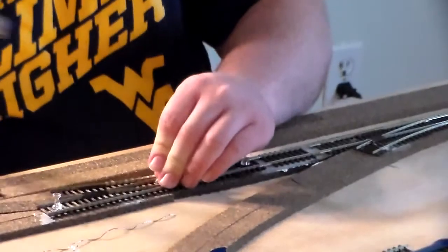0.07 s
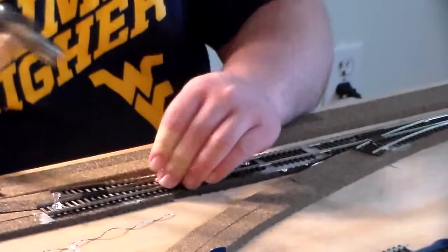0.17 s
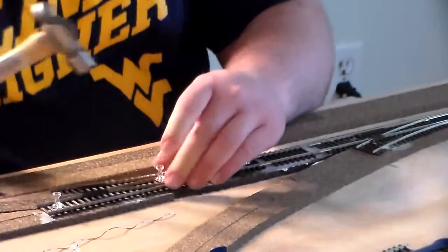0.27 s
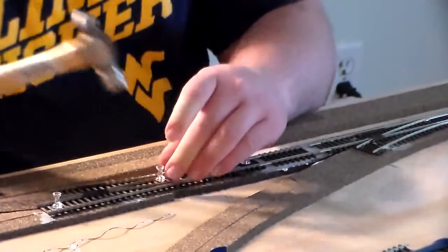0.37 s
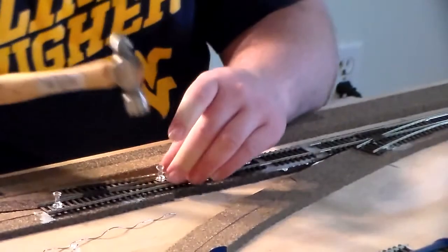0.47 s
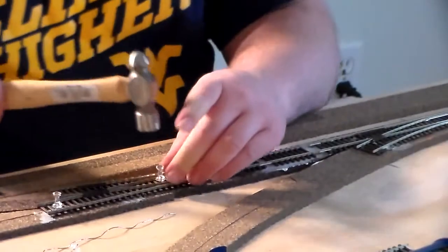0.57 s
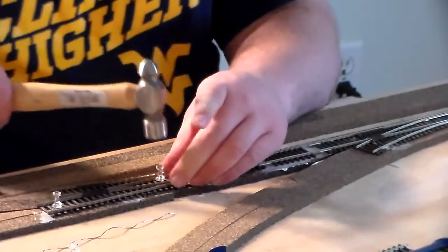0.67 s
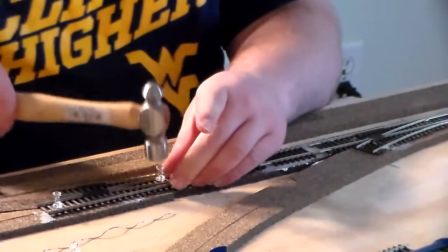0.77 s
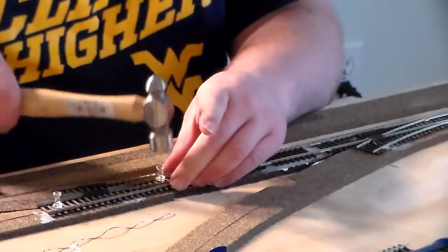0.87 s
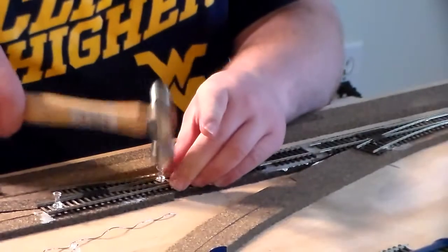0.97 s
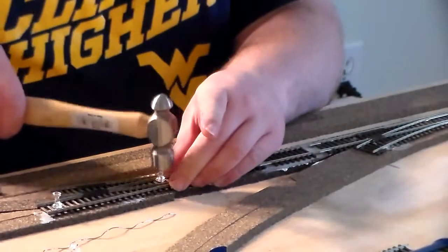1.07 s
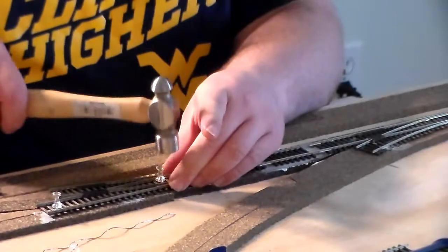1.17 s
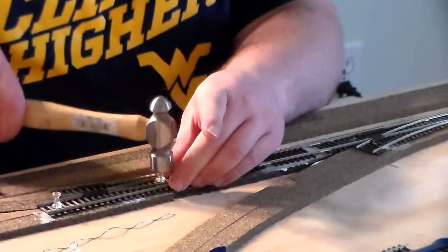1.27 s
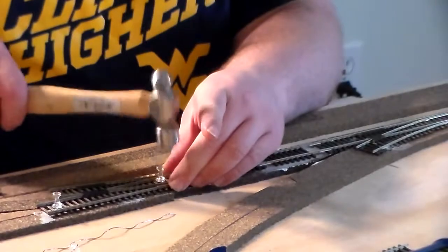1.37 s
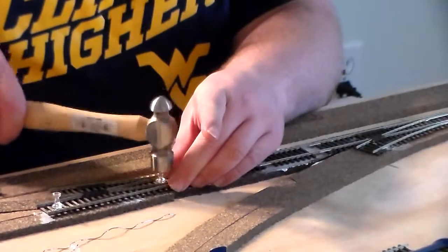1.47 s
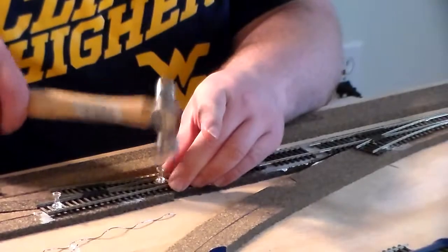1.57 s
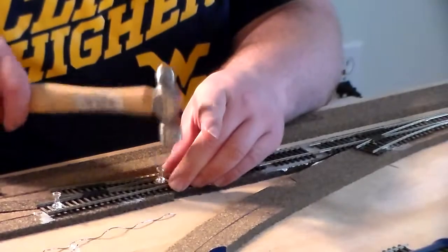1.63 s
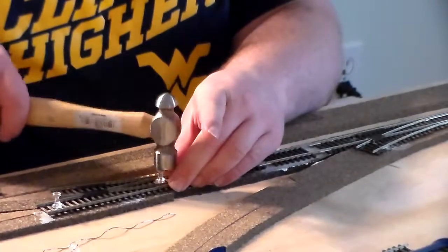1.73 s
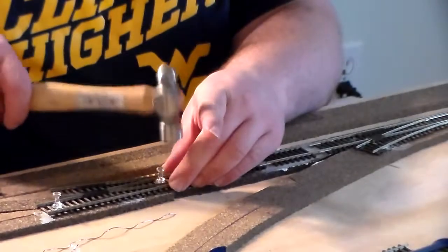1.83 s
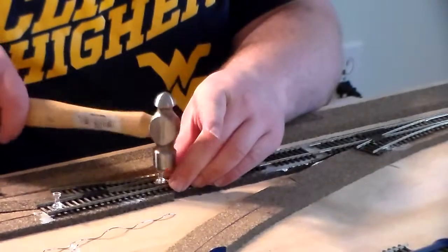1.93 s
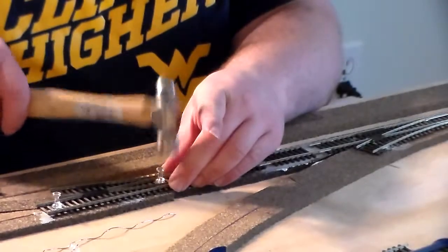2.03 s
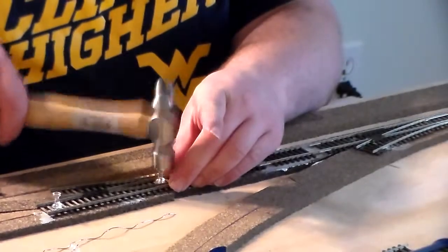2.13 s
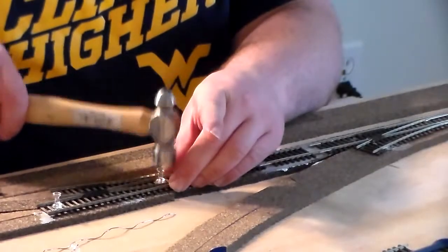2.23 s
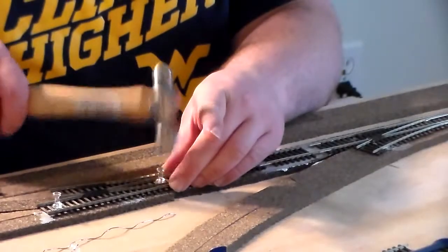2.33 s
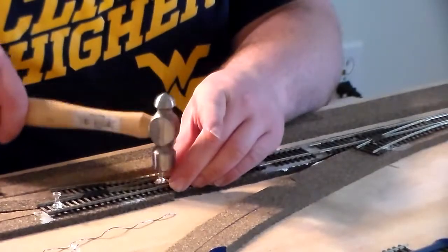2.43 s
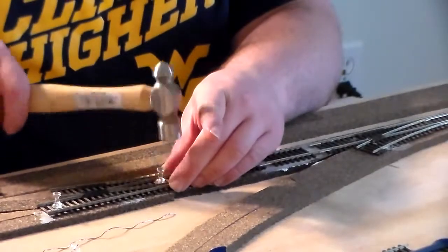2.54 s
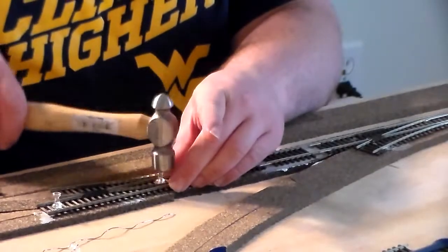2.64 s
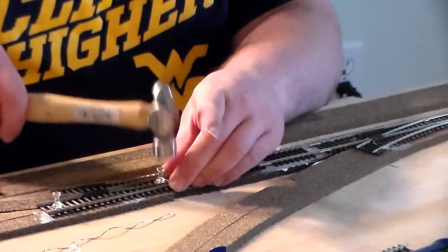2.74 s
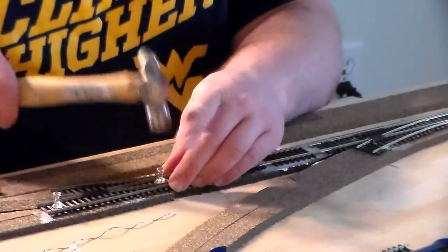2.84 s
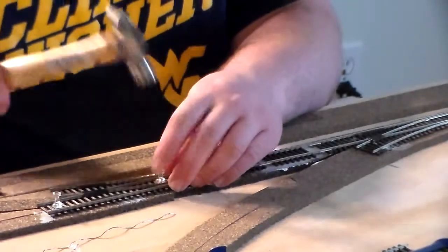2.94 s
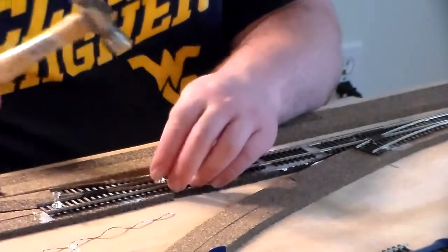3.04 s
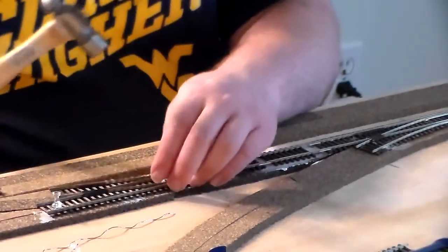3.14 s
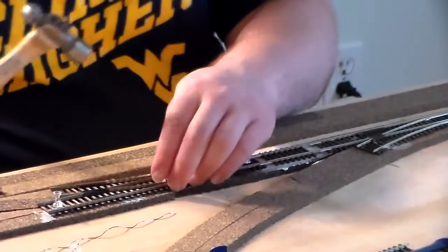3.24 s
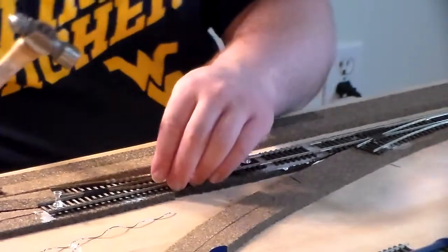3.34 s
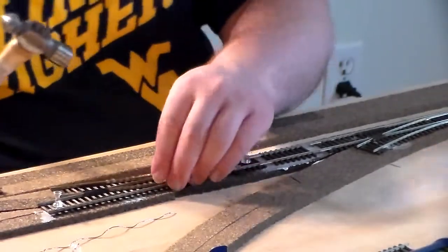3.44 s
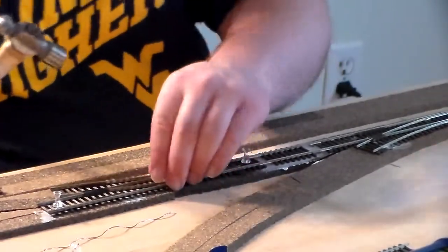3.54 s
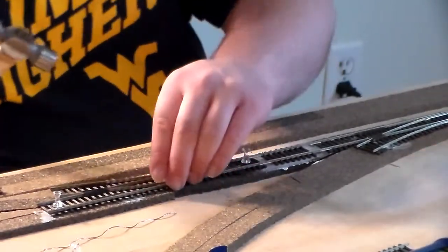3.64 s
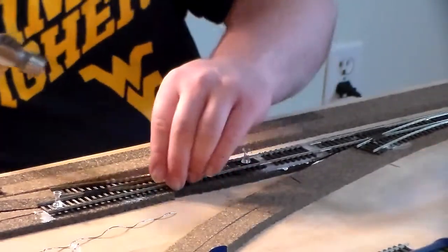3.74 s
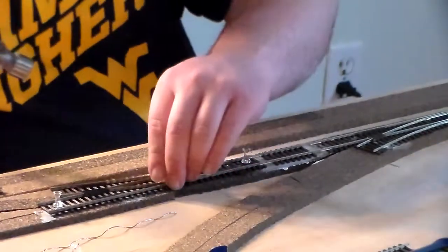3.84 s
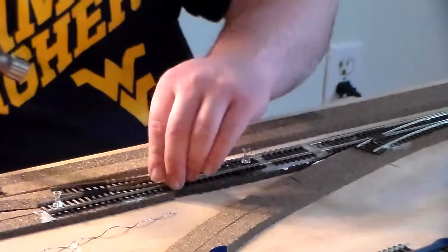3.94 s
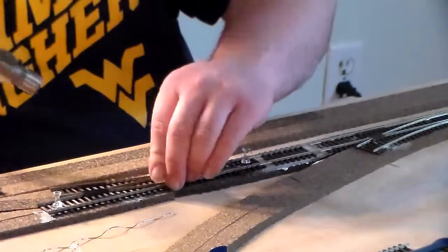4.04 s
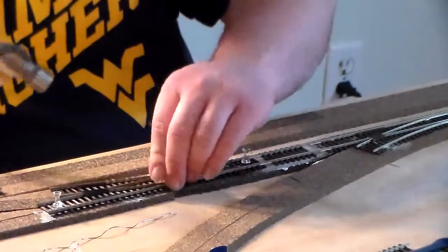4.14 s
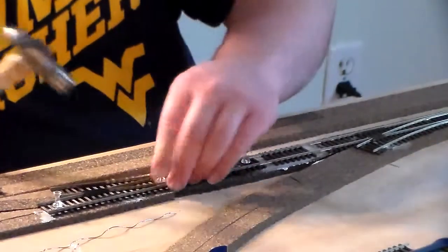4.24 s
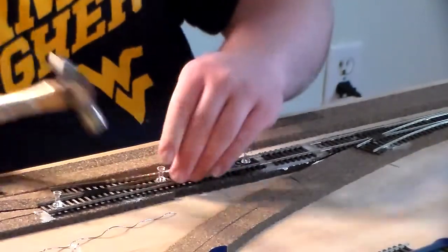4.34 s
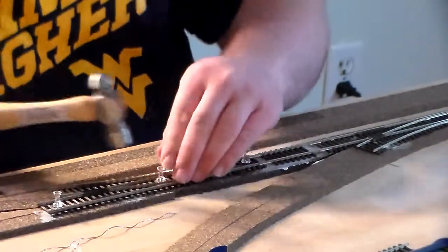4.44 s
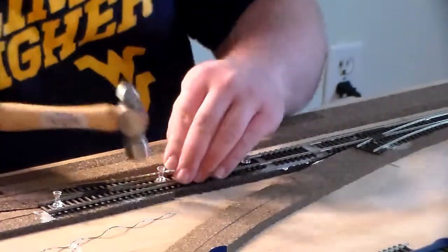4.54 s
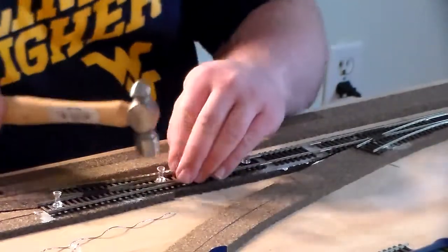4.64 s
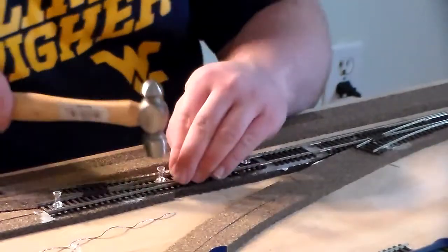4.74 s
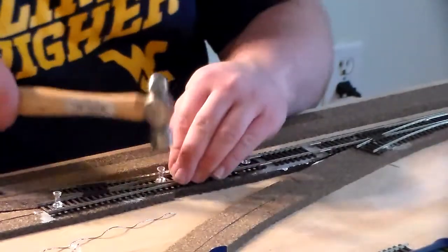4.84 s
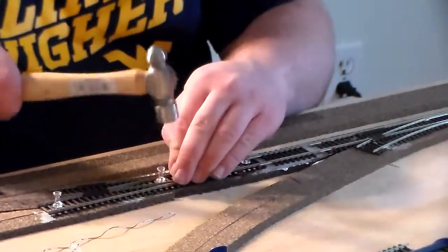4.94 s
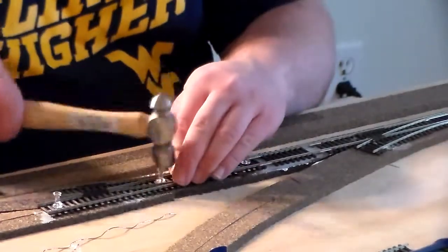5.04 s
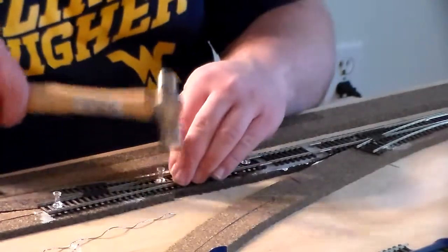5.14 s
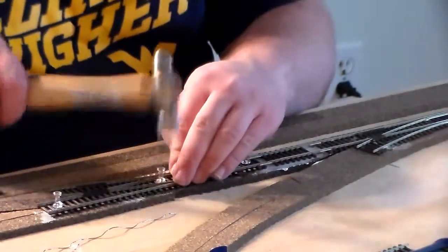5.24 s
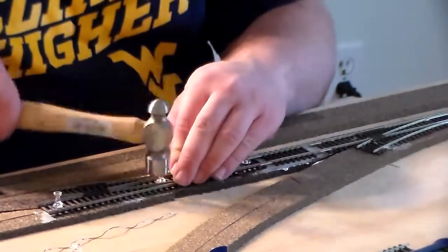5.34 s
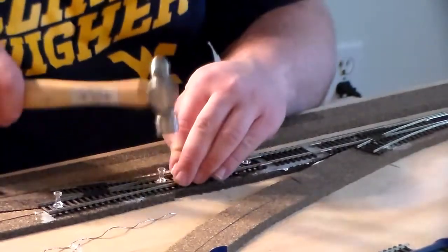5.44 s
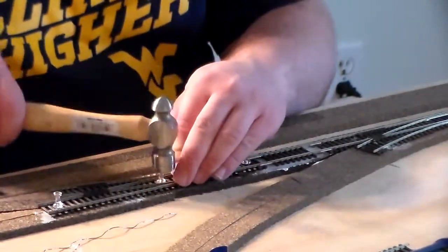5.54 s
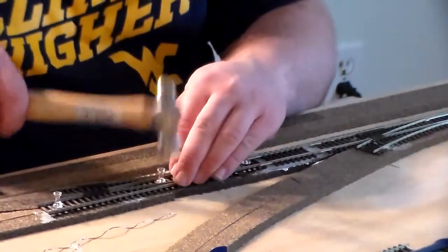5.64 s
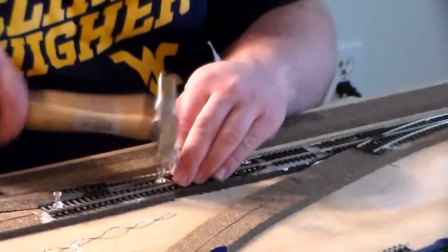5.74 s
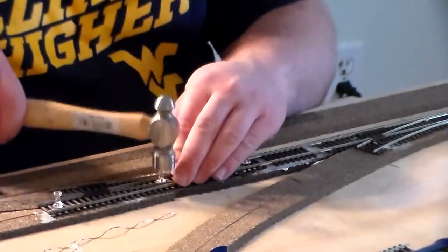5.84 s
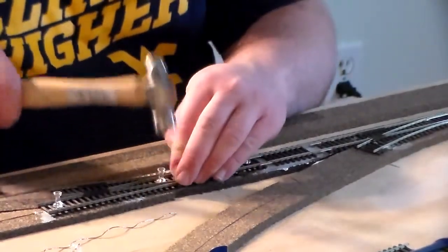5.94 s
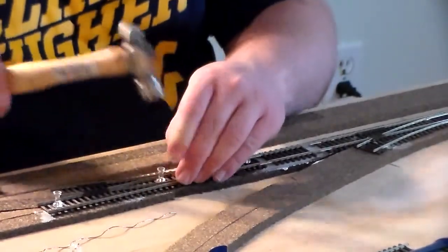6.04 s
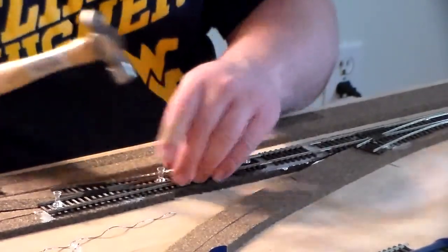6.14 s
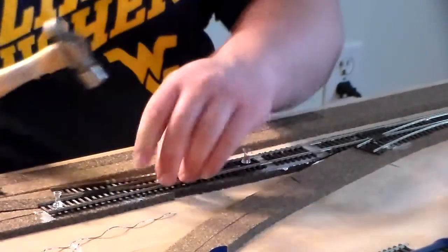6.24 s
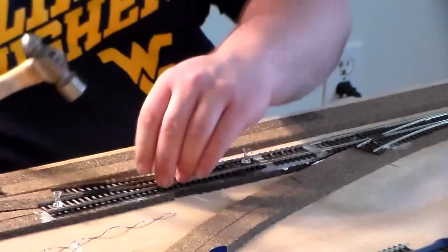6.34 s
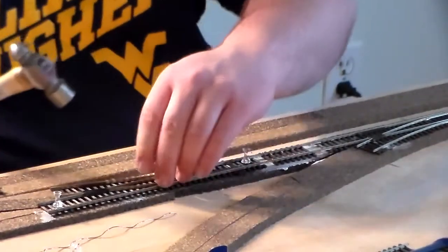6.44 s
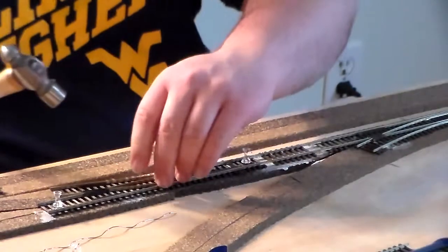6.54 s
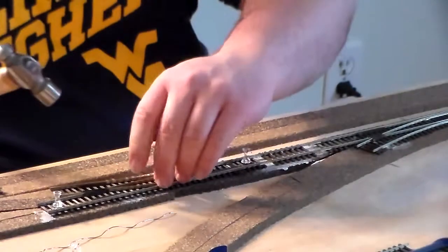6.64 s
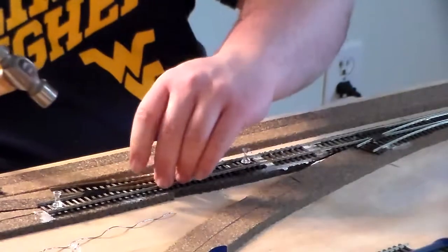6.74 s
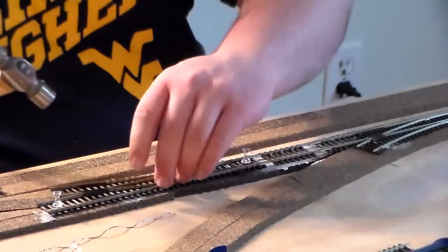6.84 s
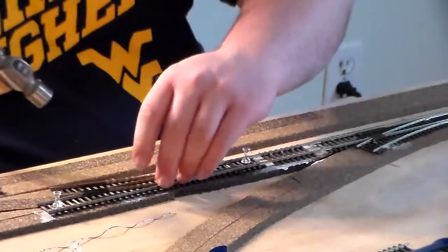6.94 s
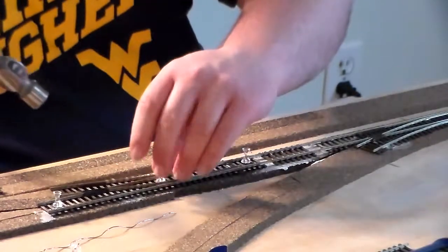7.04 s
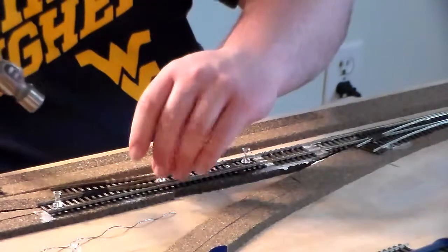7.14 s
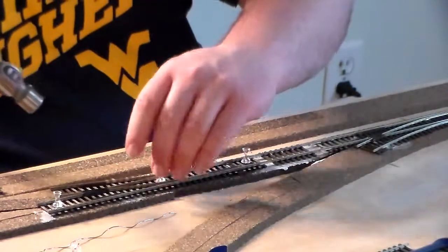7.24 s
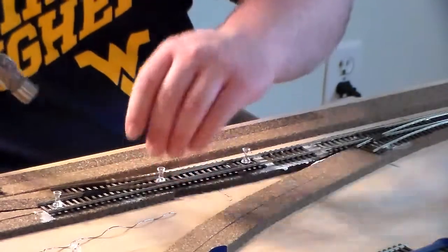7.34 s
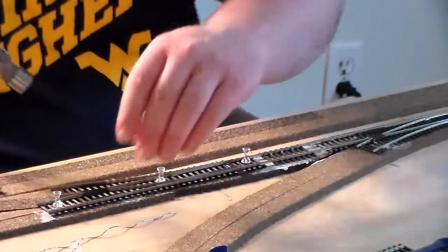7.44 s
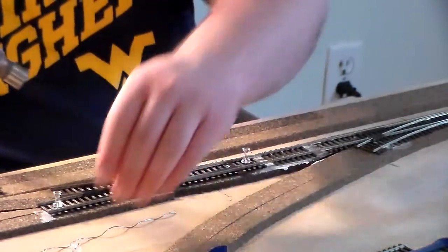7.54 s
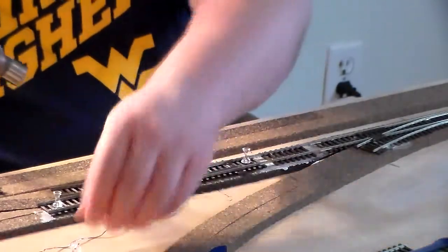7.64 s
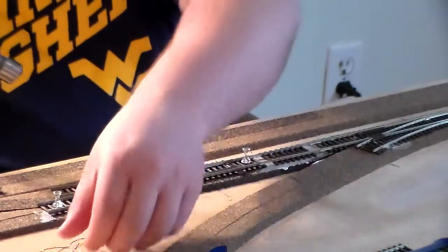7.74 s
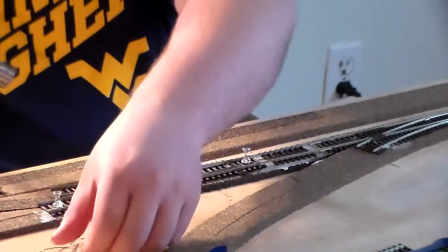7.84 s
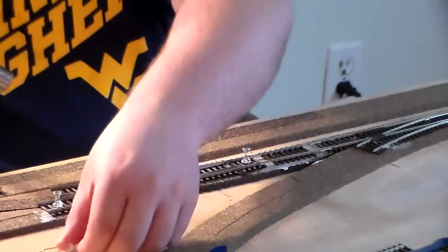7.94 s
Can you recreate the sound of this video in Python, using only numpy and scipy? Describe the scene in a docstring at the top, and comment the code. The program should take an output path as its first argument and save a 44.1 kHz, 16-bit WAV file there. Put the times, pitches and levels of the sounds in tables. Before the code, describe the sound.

A small metal hammer taps two push pins through plastic model track into cork on a wooden table, over low room hum.

```python
"""Fingertips click and rub on model track, then a small hammer taps a push pin through it into cork on a
plywood table: eight blows, the first one double. The pin is let go with a flick; a second takes four blows.
Each blow ticks in the pin, thumps the board's modes, clacks the track and fills a small room with shaped noise.
Sine hum and filtered-noise hiss lie underneath, and the camera's limiter ducks them after the harder blows."""
import sys
import numpy as np
from scipy import signal
from scipy.fft import rfft, irfft, next_fast_len
from scipy.io import wavfile
from scipy.ndimage import uniform_filter1d

SR = 44100
rng = np.random.default_rng(int(sys.argv[2]) if len(sys.argv) > 2 else 0)


def to_wav(s):
    """Save 16-bit WAV."""
    ch = np.atleast_2d(s).T  # columns
    pcm = np.round(np.clip(ch, -1, 1) * 32767)  # PCM
    wavfile.write(sys.argv[1], SR, pcm.astype(np.int16))


N = 352956

# All table levels are relative, before the gains of the functions that use them.
# spectrum of room air and microphone hiss: pitch_hz [Hz], level_db [dB]
AIR_SPECTRUM = [(10, -15), (20, -3.5), (30, -3.5), (45, -8), (65, -3.5), (87, -14), (130, -15),
                (250, -19.5), (460, -17.5), (600, -24.5), (900, -27.5), (2500, -31.5), (6000, -35.5),
                (14500, -39)]
# likeness of the air noise in the two channels: pitch_hz [Hz], likeness [0 to 1]
AIR_LIKENESS = [(30, 0.79), (300, 0.77), (800, 0.53), (2000, 0.35), (5000, 0.05), (14000, 0.039)]
# components of the mains hum: pitch_hz [Hz], level_db [dB rms]
HUM_TONES = [(29.5, -58), (59.6, -65.5), (120, -56), (240, -66), (360, -72)]
# decay of the room: pitch_hz [Hz], t60_s [s]
ROOM_T60 = [(150, 0.45), (500, 0.34), (1500, 0.32), (3500, 0.32), (7000, 0.33), (13000, 0.2)]
# likeness of the room's sound in the two channels: pitch_hz [Hz], likeness [0 to 1]
ROOM_LIKENESS = [(100, 1), (500, 0.96), (1200, 0.91), (2500, 0.89), (4500, 0.6), (8000, 0.2), (14000, 0.14)]
# stiff resonances of the track strip: pitch_hz [Hz], width_hz [Hz], level_db [dB]
TRACK_RESONANCES = [(1880, 490, 2.5), (2653, 100, 2.5), (3500, 250, 2.5), (4635, 130, 5), (5560, 150, 1.5)]
# fingertips landing on the track: start_s [s], level_db [dB], tilt_db [dB per octave]
TOUCHES = [(.845, -20, 2), (3.735, -27, -3), (4.568, -29, -2.5), (6.725, -41, -3), (7.765, -30, 4.5)]
# spectrum of a light click of plastic: pitch_hz [Hz], level_db [dB]
TOUCH_SPECTRUM = [(80, -40), (160, -7.5), (600, 9.5), (1200, 0.5), (3500, 1), (6000, -6), (9000, -13),
                  (14000, -18)]
# fingers letting go of a seated pin: start_s [s], level_db [dB]
RELEASES = [(3.085, -14), (6.124, -13)]
# fingertips rubbing along the pin: start_s [s], length_s [s], level_db [dB]
SCUFFS = [(0.92, .09, -17.5), (3.055, .035, -22)]
# hammer blows: start_s [s], force_db [dB], square_db (squareness of the face on the pin) [dB],
# bass_db (weight of the thump in the bass) [dB], crack_db (crack of the plastic head) [dB]
BLOWS = [(1.1609, -14.5, -2, -14, 2), (1.165, -5.5, -2, -6.5, 13), (1.3989, -2.5, -4, 0.5, 3),
         (1.6184, 2, 0, 5, 3.5), (1.8576, 2.5, -4, 3, -5), (2.0905, 3.5, -6.5, 5, -5),
         (2.3177, 4.5, 3.5, 8.5, -2), (2.5468, 6.5, 1, 7, -10), (2.7702, 7, 3, 3, -5),
         (5.197, 9.5, 2.5, -7, -2), (5.4609, 10, -3.5, -16.5, 8), (5.7005, 12.5, -3, -9.5, -5),
         (5.9265, 12.5, 0, -4.5, 2)]
# modes of the table, before chance shifts them and the hand damps them: pitch_hz [Hz], level_db [dB], t60_s [s]
BOARD_MODES = [(163.5, 3, .28), (196.4, 1.5, 0.26), (221.7, -4.5, 0.29), (270.1, -10.5, 0.38),
               (292.6, 0, 0.18), (361.6, 2.5, 0.15), (422, 2, 0.29), (442, -10.5, 0.44), (474, -4.5, 0.42),
               (517.7, -4, 0.32), (522, -9.5, 0.35), (537, -8.5, 0.43), (558.3, 0, 0.21), (655, -6, 0.39),
               (691.7, -4.5, 0.22), (711, -6.5, 0.38), (876, -24, 0.083), (958, -8.5, 0.233),
               (1180, -23.5, 0.65), (1273, -44, 0.25)]
# first quick heave of the board under the pin: pitch_hz [Hz], level_db [dB], t60_s [s]
HEAVE_MODES = [(237.6, -31, 0.064), (494, -20, 0.043), (674, -52, 0.017)]
# faint ring of the steel hammer head, before detuning: pitch_hz [Hz], level_db [dB], t60_s [s]
STEEL_MODES = [(4500, -51, 0.53), (5400, -63, 0.71), (5520, -49, 0.43), (5520, -51.5, 0.58),
               (5680, -45, 0.37)]
# spectrum of pin and track as the room returns it: pitch_hz [Hz], level_db [dB]
CLACK_SPECTRUM = [(90, -8.5), (160, 2.5), (450, 7), (800, -0.5), (1200, -1.5), (2000, -3), (3000, -5.5),
                  (3900, -4.5), (4800, -12), (6000, -13), (8000, -19), (13000, -16), (16000, -53)]

# limiter: threshold, hold from the start of a run of peaks, and the quiet that ends a run; then the band limit
CEILING_DB, HOLD_S, REST_S = -13.5, 0.51, 1
EDGE_HZ = 14400
# release: the first flick is softer and brighter (dB; tilts in dB per octave)
FLICK_GAP_S, FIRST_FLICK_DB, FIRST_TILT_DB, SECOND_TILT_DB = 0.013, -5, 4.5, 2.5
SCUFF_HZ, SCUFF_GRAINS_PER_S = 3170, 770
# a pin that needs more force gives way for a shorter time: slide at 0 dB, and dB of force that halve it
SLIDE_MS, SLIDE_HALVING_DB = 2.18, 11.5
# thump level (dB), and what it loses overall per dB of bass weight (dB per dB)
THUMP_DB, KNOCK_LOSS = -0.17, 0.32
BOOM_DB = -7  # the thump as the room returns it
# the board's modes vary by chance from blow to blow, in level and pitch (dB, share)
RING_SPREAD_DB, RING_DETUNE = 1.5, 0.0122
# the resting hand damps them, more at lighter blows: t60 at 0 dB of force (s), and dB of force that double it
HAND_T60, HAND_DOUBLING_DB = 0.67, 7
CLACK_TILT_DB, BRIGHTENING = -1.45, 0.071  # dB per octave, and its rise per dB of force
# loose part of the track once pinned down: pitch, share of chance, level, and gain on off-centre blows (dB per dB)
RATTLE_HZ, RATTLE_SPREAD, RATTLE_DB, GLANCE_RATTLE = 2930, 0.09, 4, 0.44
SLACK_DB, SLACK_RANGE_DB = -4, 2.5  # under blows lighter than this the track lies slack and rattles lower
CRACK_DB, CRACK_S = -39.5, 0.0012  # the plastic head's crack: level, decay time constant
# the pin's tick: level, growth with force (dB per dB), pitch, share of chance
TICK_DB, TICK_GROWTH, TICK_HZ, TICK_SPREAD = -14.5, 0.74, 3990, 0.03
# the head sings on hard, off-centre blows: level, dB per dB of force, dB per dB off-centre, share of detuning
STEEL_DB, STEEL_GROWTH, GLANCE_RING, STEEL_DETUNE = -10, 0.94, 1, 0.0081


def amp(db):
    """Logarithmic level: decibels to gain."""
    return 10 ** (np.asarray(db) / 20)


def balance(left_db):
    """Level difference in stereo: left gains what right loses."""
    return amp([[left_db], [-left_db]])


def evened(x):
    """Normalisation: scales to rms 1."""
    return x / np.sqrt(np.mean(x ** 2) + 1e-20)


def read(points, hz):
    """Interpolation on a logarithmic frequency axis."""
    f, value = np.transpose(points)
    return np.interp(np.log(hz + 1), np.log(f + 1), value)


def add(mix, start_s, sound):
    """Superposition: adds a sound to both channels at its start."""
    part = mix[:, max(round(start_s * SR), 0):][:, :sound.shape[-1]]
    part += sound[..., :part.shape[1]]


def colour(x, points, tilt_db=0):
    """Linear filtering: multiplies by a spectrum, tilted by so many dB an octave."""
    size = next_fast_len(x.shape[-1])
    hz = np.fft.rfftfreq(size, 1 / SR)
    gain = amp(read(points, hz) + tilt_db * np.log2((hz + 100) / 3000))
    return irfft(rfft(x, size) * gain, size)[..., :x.shape[-1]]


def pair_noise(size, likeness):
    """Spatial coherence: white noise in two channels, alike in the bass and unlike in the treble."""
    a, b = rfft(rng.standard_normal((2, size)))
    same = np.clip(read(likeness, np.fft.rfftfreq(size, 1 / SR)), 0, 1)
    return irfft(np.array([a, same * a + np.sqrt(1 - same ** 2) * b]), size)


def background():
    """Stationary noise and periodic hum: steady air and hiss, with mains tones whose phase wavers."""
    t = np.arange(N) / SR
    air = evened(colour(pair_noise(next_fast_len(N), AIR_LIKENESS), AIR_SPECTRUM))[:, :N]
    knots = np.linspace(0, t[-1], num=40)
    hum = np.zeros(N)
    for pitch_hz, level_db in HUM_TONES:
        waver = 0.18 * np.interp(t, knots, rng.standard_normal(len(knots)))  # radians
        hum += amp(level_db) * np.sqrt(2) * np.sin(2 * np.pi * pitch_hz * t + waver)
    return (amp(-53.0) * air + hum) * balance(0.2)


def room(noise, spectrum, build_s, tilt_db=0):
    """Diffuse reverberation: reflections thicken while each band dies at its own speed."""
    hz, t, bands = signal.stft(colour(noise, spectrum, tilt_db), SR, nperseg=512)
    decay = amp(-60 * t / read(ROOM_T60, hz)[:, None])
    tail = signal.istft(bands * decay, SR, nperseg=512)[1][:, :SR]
    return tail * (1 - np.exp(-np.arange(SR) / SR / build_s))


def snap(length_s, tilt_db=0):
    """Impulsive excitation: the brief direct crack of hard plastic, decaying exponentially."""
    noise = colour(pair_noise(SR, ROOM_LIKENESS), TOUCH_SPECTRUM, tilt_db)
    return noise * np.exp(-np.arange(SR) / SR / length_s)


def track(x, rattle_hz=3000, rattle_db=5, rattle_width_hz=280):
    """Resonance: the strip's fixed peaks, one rattling part, and random patches that differ each time."""
    hz = np.fft.rfftfreq(2 * SR, 1 / SR)
    peaks_db = np.zeros(len(hz))
    for pitch_hz, width_hz, level_db in TRACK_RESONANCES + [(rattle_hz, rattle_width_hz, rattle_db)]:
        peaks_db += level_db / (1 + ((hz - pitch_hz) / (width_hz / 2)) ** 2)
    knots = np.linspace(0, SR / 2, num=260)
    patches_db = 3.2 * np.interp(hz, knots, rng.standard_normal(len(knots)))
    patches_db *= hz / (hz + 600)  # smooth in the bass
    return irfft(rfft(x, 2 * SR) * amp(peaks_db + patches_db))[..., :SR]


def touch(tilt_db, onset_s):
    """Light impact: one click of plastic, direct and through the room, with a softened onset."""
    tail = room(pair_noise(SR, ROOM_LIKENESS), TOUCH_SPECTRUM, build_s=0.0009, tilt_db=tilt_db)
    click = amp(-15.0) * snap(length_s=0.0034, tilt_db=tilt_db) + amp(-24.5) * tail
    return click * (1 - np.exp(-np.arange(SR) / SR / onset_s))


def scuff(length_s):
    """Stick-slip friction: a swelling run of tiny random slips, each a click that rings the pin."""
    t = np.arange(0, length_s, 1 / SR)
    strength = rng.standard_normal(SR)[:len(t)]
    happens = rng.random(SR)[:len(t)] < SCUFF_GRAINS_PER_S / SR
    slips = strength * happens * np.sqrt(t / length_s)
    slips = slips / (np.linalg.norm(slips) + 1e-9)
    rub = signal.fftconvolve(touch(tilt_db=0.8, onset_s=0.00051), slips[None], axes=1)
    return track(rub, SCUFF_HZ, rattle_db=4, rattle_width_hz=650)


def fingers():
    """Impact and friction: light clicks and scuffs, and the double flick of each pin as it is let go."""
    out = np.zeros((2, N))
    for start_s, level_db in RELEASES:
        first = track(touch(FIRST_TILT_DB, onset_s=0.00063), rattle_hz=4300, rattle_db=8)
        add(out, start_s, amp(level_db + FIRST_FLICK_DB) * first)
        second = track(touch(SECOND_TILT_DB, onset_s=0.00028), rattle_db=3.0)
        add(out, start_s + FLICK_GAP_S, amp(level_db) * second)
    for start_s, level_db, tilt_db in TOUCHES:
        add(out, start_s, amp(level_db) * track(touch(tilt_db, onset_s=0.0023), rattle_db=0.0))
    for start_s, length_s, level_db in SCUFFS:
        add(out, start_s, amp(level_db) * scuff(length_s))
    return out


def ring(modes, turns=0):
    """Modal synthesis: a sum of dying sines, each starting at its own share of a turn."""
    t = np.arange(SR) / SR
    pitch_hz, level_db, t60_s = np.transpose(modes)[..., None]
    return (amp(level_db - 60 * t / t60_s) * np.sin(2 * np.pi * (pitch_hz * t + turns))).sum(0)


def echoed(x, delay_s, db):
    """Specular reflection: a sound and one repeat of it."""
    t = np.arange(len(x)) / SR
    return x + amp(db) * np.interp(t - delay_s, t, x, left=0)


def table(hand_t60, low_hz=138, lag_turns=0.335):
    """Modal vibration: the board heaves, a near surface throws that back, and the damped modes ring on."""
    # each mode trails the one below, so the knock swells for some ms
    lags = -lag_turns * np.arange(len(BOARD_MODES))[:, None]
    modes = []
    luck = rng.standard_normal((len(BOARD_MODES), 2))
    for (pitch_hz, level_db, t60_s), (shift, weight) in zip(BOARD_MODES, luck):
        damped_t60 = 1 / (1 / t60_s + 1 / hand_t60)  # decay rates add
        modes.append((pitch_hz * (1 + RING_DETUNE * shift), level_db + RING_SPREAD_DB * weight, damped_t60))
    heave = echoed(ring(HEAVE_MODES), delay_s=0.009825, db=-6.0)
    wood = amp(-31.5) * ring(modes, lags) + amp(0.33) * heave
    # the board radiates little deep bass
    return signal.sosfilt(signal.butter(4, low_hz, "high", fs=SR, output="sos"), wood)


def push(x, slide_ms, bass_db, stop=0.62, bass_hz=320):
    """Stick-slip as a comb filter: the pin breaks loose and stops again, two opposite kicks."""
    hz = np.fft.rfftfreq(2 * SR, 1 / SR)
    delay = np.exp(-2j * np.pi * hz * slide_ms / 1000)
    kicks = 1 - stop * delay / (1 + (hz / 2000) ** 2)  # the stop is duller
    weight = 1 + (amp(bass_db) - 1) / (1 + 1j * hz / bass_hz)
    return irfft(rfft(x, 2 * SR) * kicks * weight)[..., :SR]


def boomed(x, build_s=0.011, t60=0.23):
    """Reverberation by convolution: a thump and its diffuse return from the nearby walls."""
    t = np.arange(SR) / SR
    walls = pair_noise(SR, ROOM_LIKENESS) * (1 - np.exp(-t / build_s)) * amp(-60 * t / t60)
    walls = walls / np.linalg.norm(walls[0])
    return x + amp(BOOM_DB) * signal.fftconvolve(x[None], walls, axes=1)[:, :SR]


def tick(hz, rise_s=0.00031):
    """Contact vibration: the pin's few stiff cycles under the hammer face."""
    t = np.arange(SR) / SR
    return t / rise_s * np.exp(1 - t / rise_s) * np.sin(2 * np.pi * hz * t)


def scattered(modes, build_s):
    """Diffuse excitation: waves from all sides feed the modes, which swell out of step."""
    turns = rng.random((len(modes), 1))
    return ring(modes, turns) * (1 - np.exp(-np.arange(SR) / SR / build_s))


def steel(count=3):
    """Beating: the hammer head rings with each mode a cluster of close tones."""
    modes = []
    for pitch_hz, level_db, t60_s in STEEL_MODES * count:
        modes.append((pitch_hz * (1 + STEEL_DETUNE * rng.standard_normal()), level_db, t60_s))
    return scattered(modes, build_s=0.015)


def clack(force_db, square_db, rattle_luck):
    """Forced resonance: direct snap and room tail, brighter with force, coloured by the track."""
    tilt_db = CLACK_TILT_DB + BRIGHTENING * force_db
    tail = room(pair_noise(SR, ROOM_LIKENESS), CLACK_SPECTRUM, build_s=0.012, tilt_db=tilt_db)
    direct = snap(length_s=0.0081, tilt_db=tilt_db - 3.5)
    tightness = 1 / (1 + np.exp((SLACK_DB - force_db) / SLACK_RANGE_DB))
    rattle_hz = RATTLE_HZ * (1 + RATTLE_SPREAD * rattle_luck) * tightness
    rattle_db = RATTLE_DB - GLANCE_RATTLE * square_db
    return track(amp(-19) * tail + amp(-26.5) * direct, rattle_hz, rattle_db, rattle_width_hz=510)


def hammer():
    """Impact excitation: every blow rings pin, track, board and hammer head; the room answers after."""
    out = np.zeros((2, N))
    chance = rng.standard_normal((len(BLOWS), 2))
    for (start_s, force_db, square_db, bass_db, crack_db), (pin_luck, rattle_luck) in zip(BLOWS, chance):
        slide_ms = SLIDE_MS * 2 ** (-force_db / SLIDE_HALVING_DB)
        board = table(HAND_T60 * 2 ** (force_db / HAND_DOUBLING_DB))
        thump = amp(THUMP_DB - KNOCK_LOSS * bass_db) * boomed(push(board, slide_ms, bass_db))
        plastic = clack(force_db, square_db, rattle_luck)
        plastic = plastic + amp(CRACK_DB + crack_db) * snap(length_s=CRACK_S, tilt_db=9)
        pin_db = TICK_DB + TICK_GROWTH * force_db + square_db
        pin = amp(pin_db) * tick(TICK_HZ * (1 + TICK_SPREAD * pin_luck))
        head = amp(STEEL_DB + STEEL_GROWTH * force_db - GLANCE_RING * square_db) * steel()
        add(out, start_s, amp(force_db) * (thump * balance(0.15) + plastic * balance(-0.4)))
        add(out, start_s, (pin + head) * balance(-0.5))
    return out


def scene():
    """Superposition of hammer, fingers and room tone."""
    return hammer() + fingers() + background()


def limiter(x, release_db_per_s=60, size=32):
    """Dynamic gain control: drops at once on a peak, holds early in a run of peaks, then recovers quickly."""
    starts, step_s = np.arange(0, N, size), size / SR
    smooth = uniform_filter1d(x.mean(0), size=7)  # the sharpest ticks slip through
    peaks = np.maximum.reduceat(abs(smooth), starts)
    cut_db, first_s, last_s, cuts = 0, -np.inf, -np.inf, []
    for now_s, over_db in zip(starts / SR, 20 * np.log10(peaks + 1e-9) - CEILING_DB):
        if over_db > 0:
            if now_s - last_s > REST_S:
                first_s = now_s  # a new run begins
            last_s = now_s
        recovery_db = release_db_per_s * step_s * (now_s - first_s > HOLD_S)
        cut_db = max(cut_db - recovery_db, over_db, 0)
        cuts.append(cut_db)
    return x * amp(-np.interp(np.arange(N), starts + size // 2, cuts))


def record(dry):
    """Signal chain: the camera's limiter, the faint hiss of the circuits after it, then the band limit."""
    held = limiter(dry) + amp(-69.5) * rng.standard_normal((2, N))
    lowpass = signal.firwin(511, EDGE_HZ, window=("kaiser", 9), fs=SR)
    return signal.oaconvolve(held, lowpass[None], "same")


dry = scene()
out = record(dry)
to_wav(out)
```